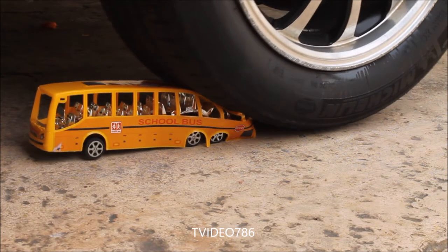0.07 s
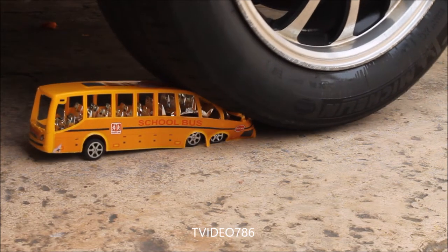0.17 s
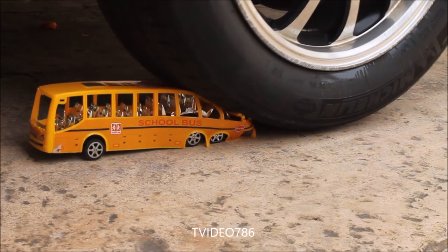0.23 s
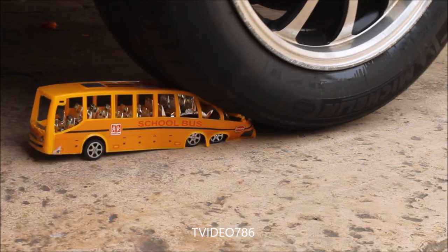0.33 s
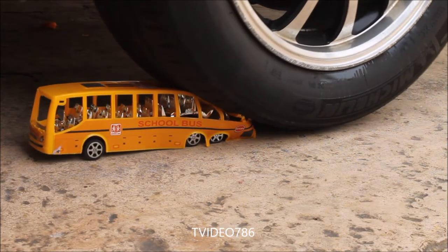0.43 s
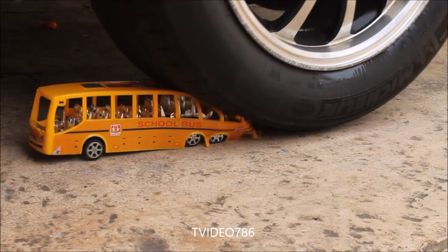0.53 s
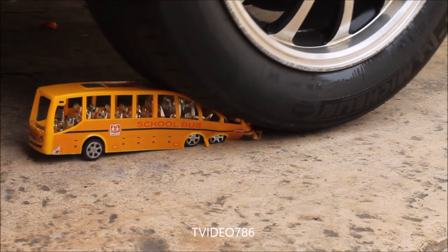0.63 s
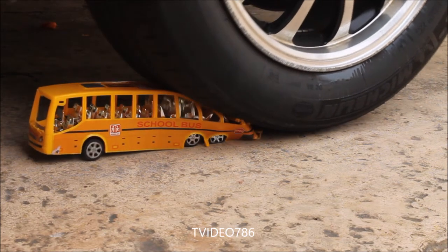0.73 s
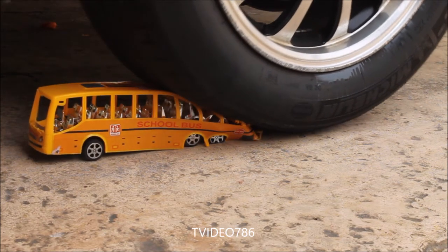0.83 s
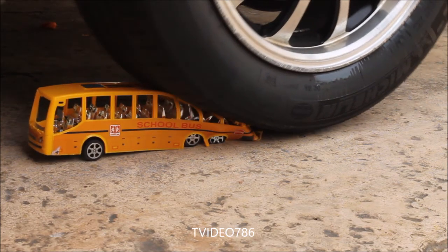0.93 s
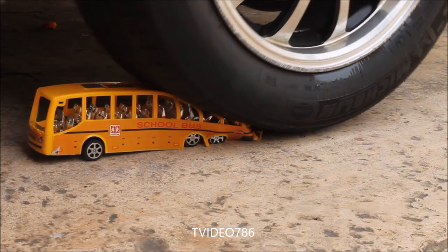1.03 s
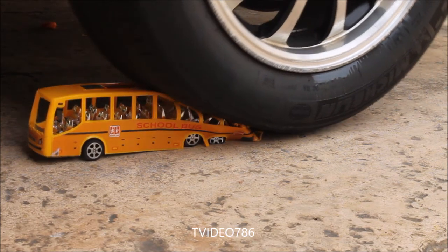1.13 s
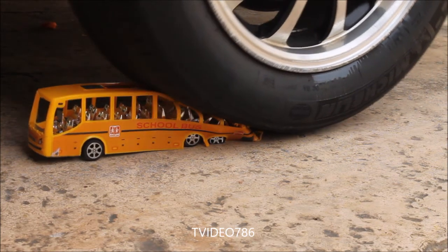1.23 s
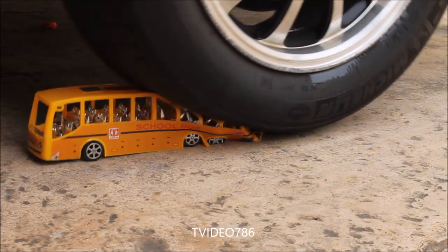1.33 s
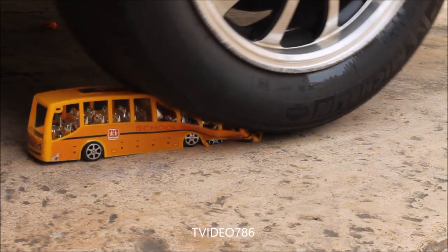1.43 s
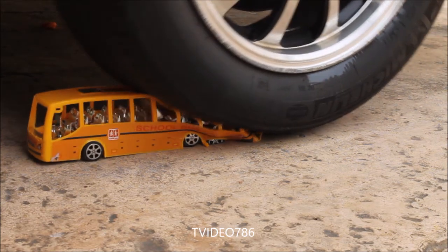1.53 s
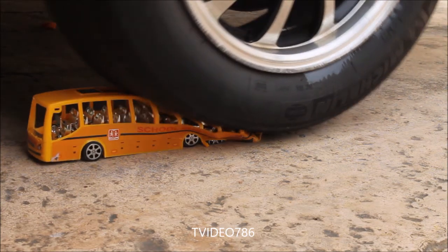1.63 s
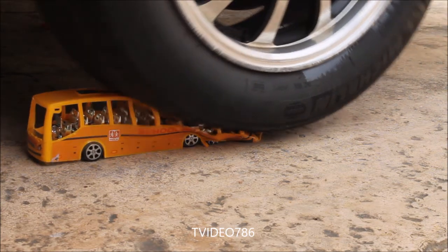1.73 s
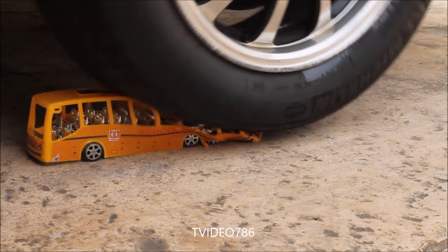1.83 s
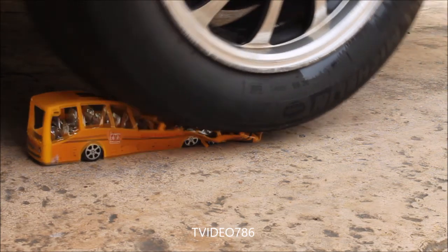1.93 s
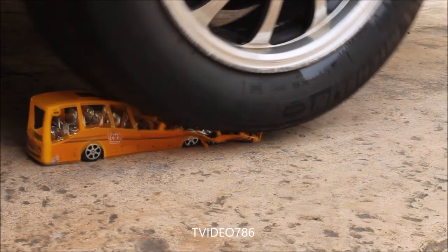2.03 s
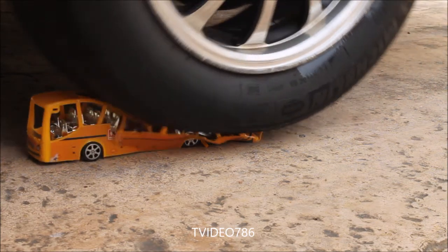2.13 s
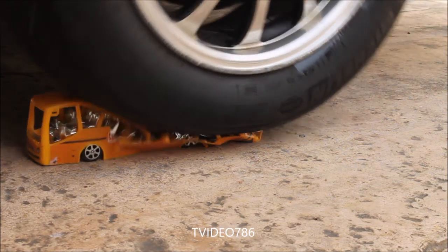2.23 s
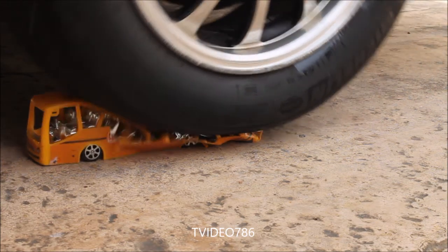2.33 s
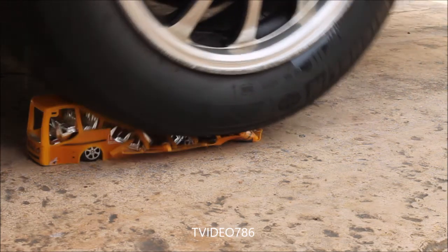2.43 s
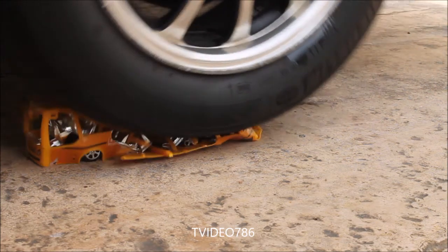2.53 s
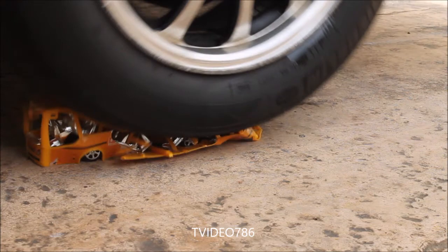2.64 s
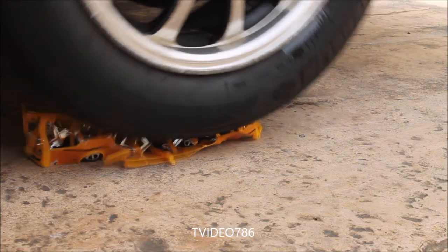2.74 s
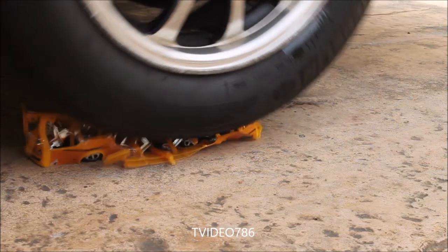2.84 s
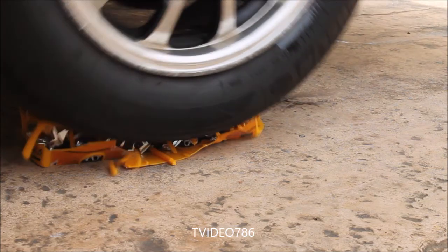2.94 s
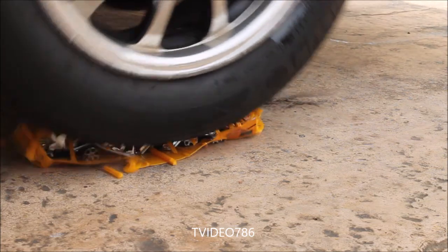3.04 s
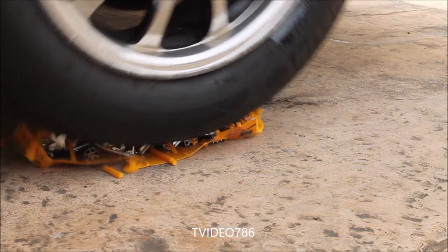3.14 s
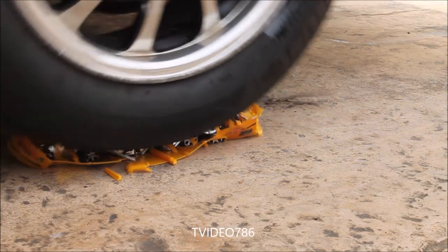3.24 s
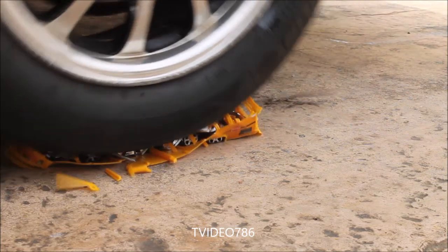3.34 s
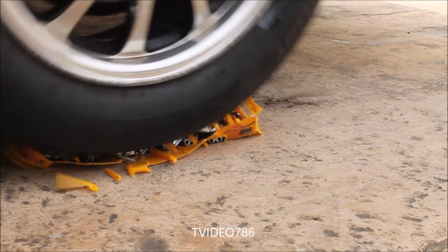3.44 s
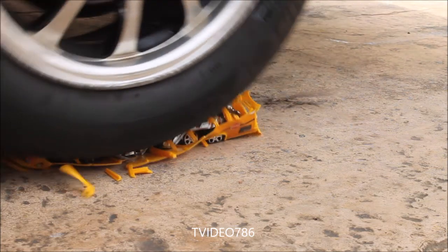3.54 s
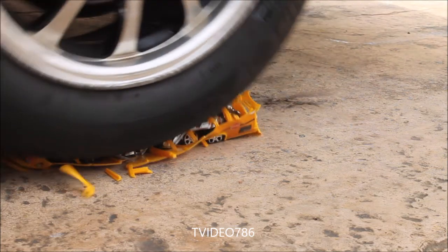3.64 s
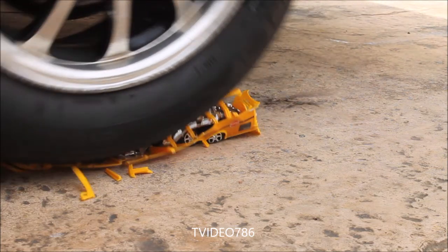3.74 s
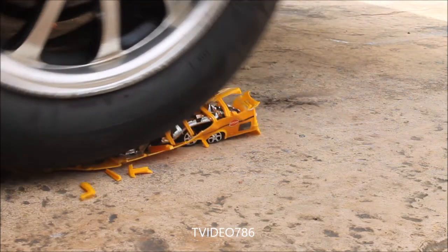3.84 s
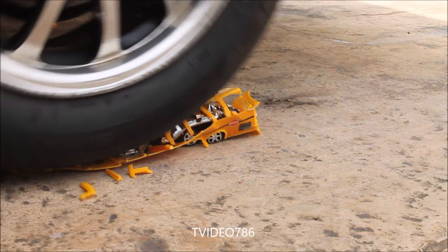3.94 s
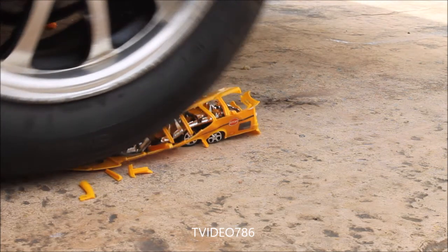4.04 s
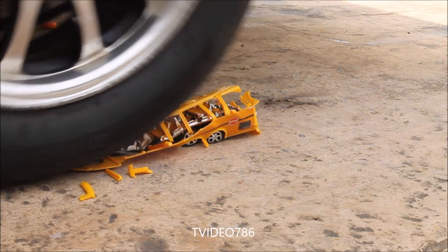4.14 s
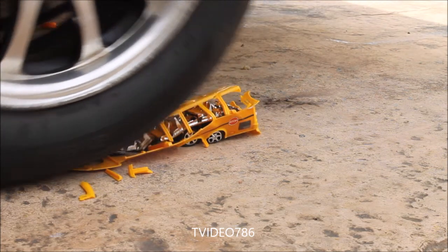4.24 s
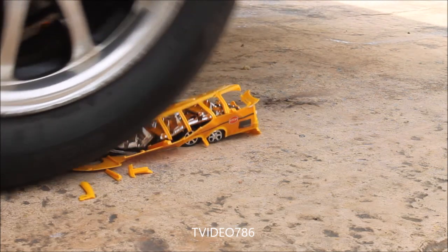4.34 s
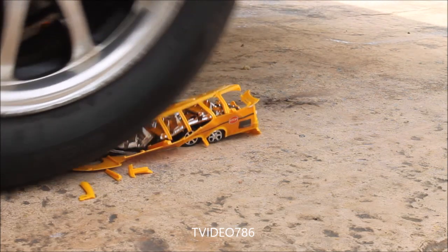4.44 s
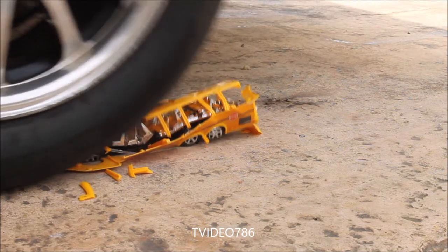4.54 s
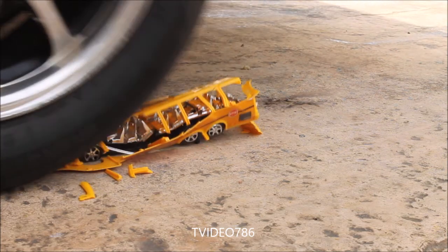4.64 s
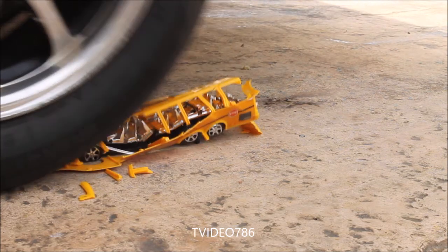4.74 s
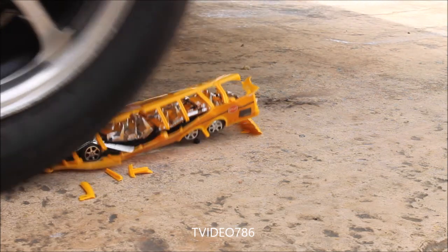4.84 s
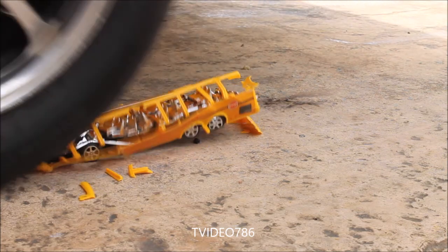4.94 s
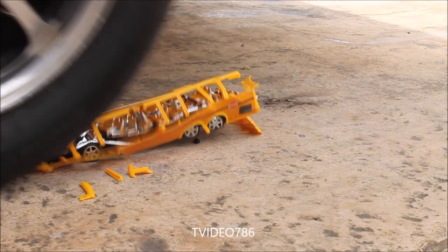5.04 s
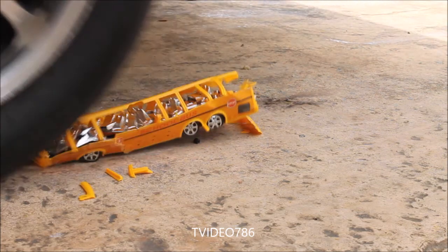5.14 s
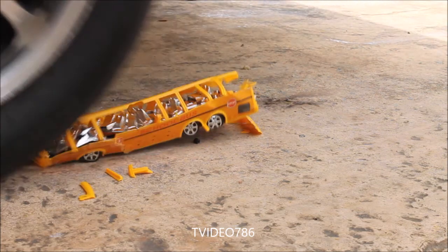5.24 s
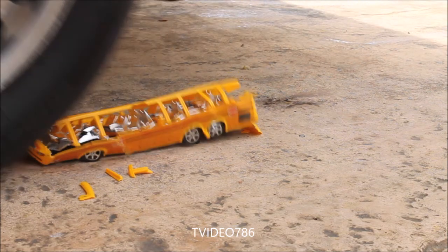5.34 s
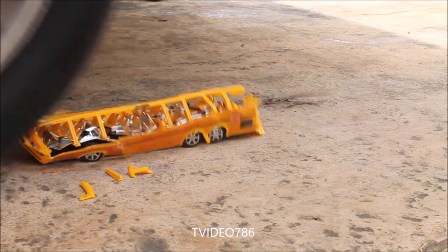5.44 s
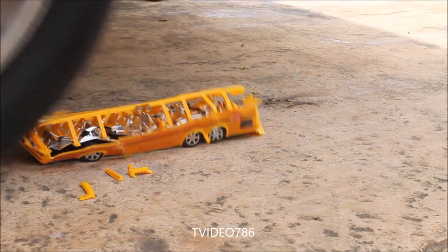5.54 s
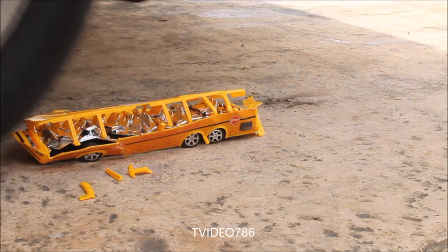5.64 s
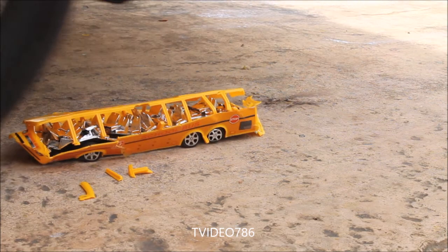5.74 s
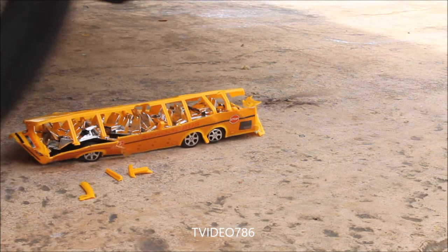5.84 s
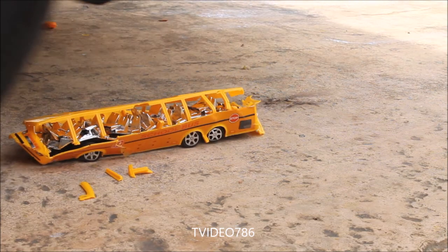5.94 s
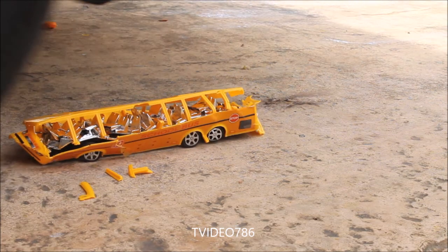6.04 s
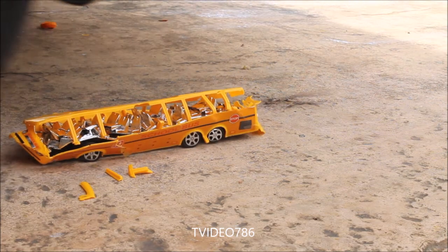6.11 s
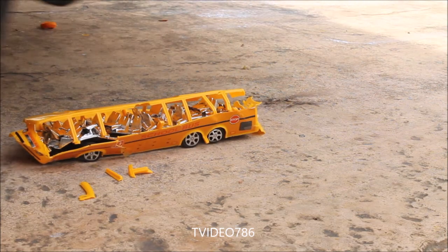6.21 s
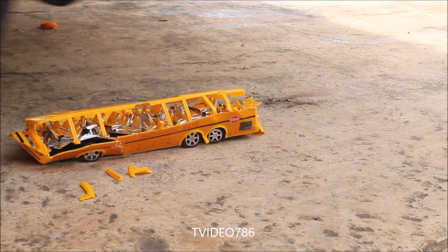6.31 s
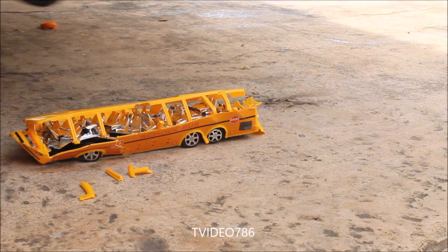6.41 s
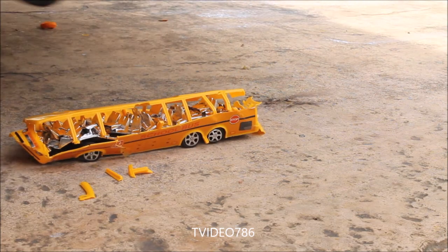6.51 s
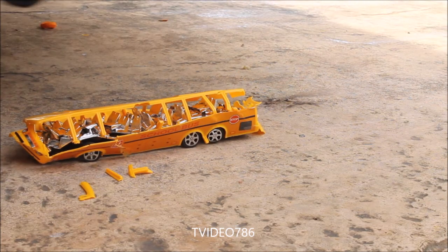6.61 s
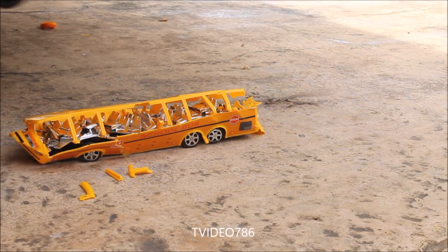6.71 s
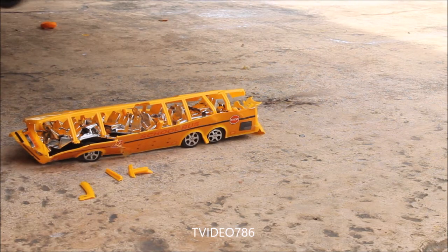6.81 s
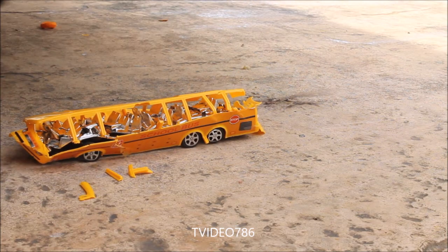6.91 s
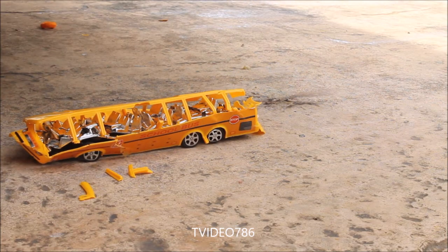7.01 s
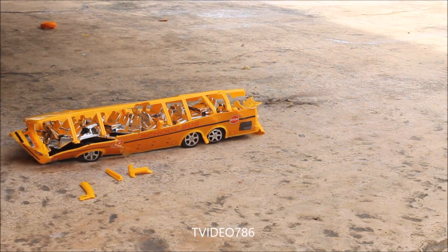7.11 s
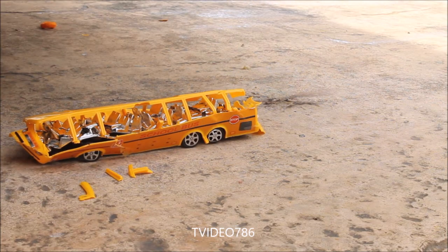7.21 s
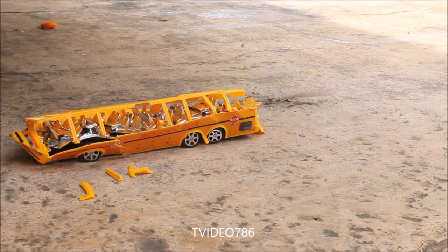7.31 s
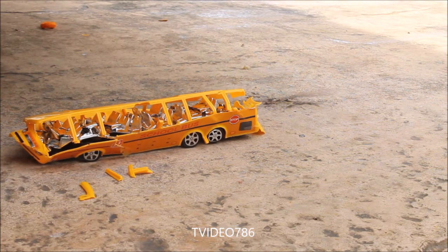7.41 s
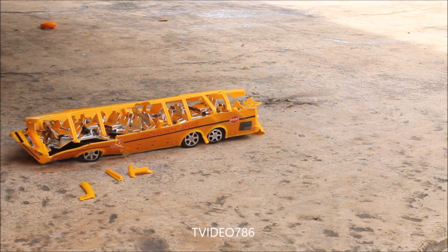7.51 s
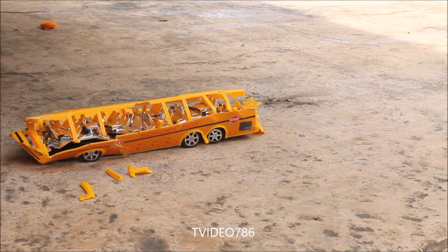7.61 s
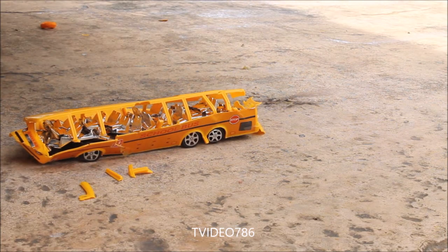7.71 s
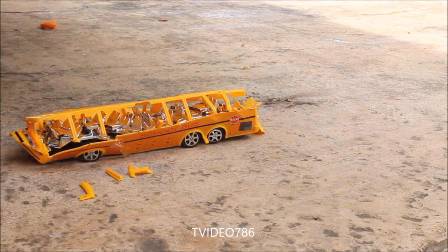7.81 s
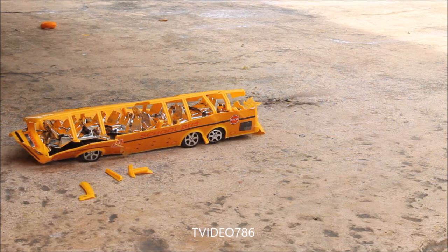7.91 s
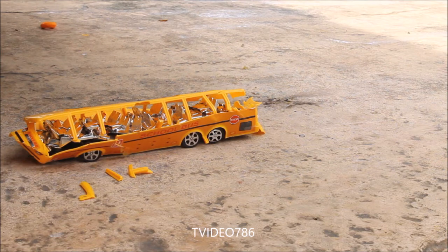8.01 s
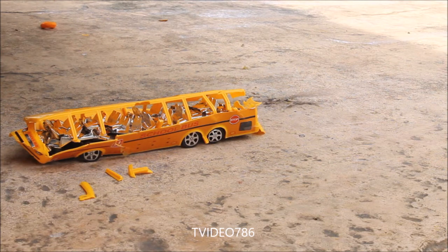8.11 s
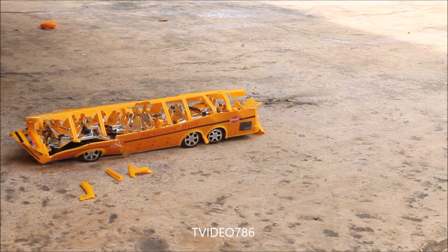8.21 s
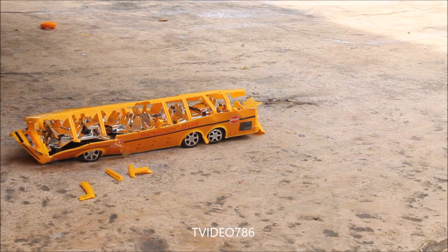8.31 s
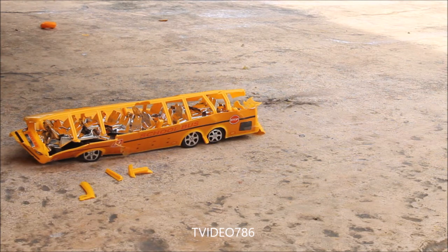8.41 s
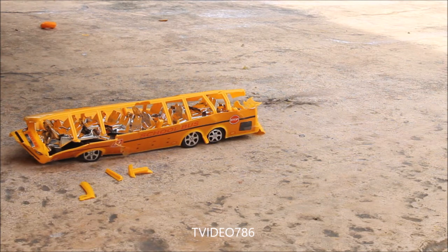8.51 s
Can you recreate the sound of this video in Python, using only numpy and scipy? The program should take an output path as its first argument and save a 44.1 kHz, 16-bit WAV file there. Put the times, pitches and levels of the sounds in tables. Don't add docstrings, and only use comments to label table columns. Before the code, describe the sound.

Close to a concrete yard floor, a tyre crushes a hollow plastic toy bus. Loud dry snaps, ragged tears and thudding cave-ins come in dense irregular clusters over fine crunching and creaking panels. Cracks grow sparser after four seconds, ending with faint taps; idling engine hum and distant traffic remain. The close microphone overloads, and the treble is dull as in slowed playback.

```python
import sys
import numpy as np
from scipy import signal
from scipy.fft import rfft, irfft
from scipy.io import wavfile
from scipy.ndimage import uniform_filter1d

SR = 44100
rng = np.random.default_rng(int(sys.argv[2]) if len(sys.argv) > 2 else 0)


def magnitude_from_level(level_db):
    exponent = np.asarray(level_db, float) / 20
    return 10 ** exponent


def dump_mix(stems):
    frames = np.atleast_2d(stems).T
    limited = np.clip(frames, -1, 1)
    pcm = np.round(limited * 32767).astype(np.int16)
    wavfile.write(sys.argv[1], SR, pcm)


N = 377496


def evened(x):
    return x / np.sqrt(np.mean(x ** 2) + 1e-20)


def read(points, hz):
    f, value = np.transpose(points)
    return np.interp(np.log(hz + 1), np.log(f + 1), value)


def follow(rows, t):
    s, *columns = np.transpose(rows)
    return [np.interp(t, s, c) for c in columns]


def add(mix, s, sound):
    part = mix[round(s * SR):][:len(sound)]
    part += sound[:len(part)]


def resonate(x, hz, width):
    turn = np.exp(2j * np.pi * np.cumsum(hz * np.ones(len(x))) / SR)
    r = np.exp(-np.pi * width / SR)
    return 2 * (turn * signal.lfilter([1 - r], [1, -r], x / turn)).real


def resonate_twice(x, hz, width):
    return resonate(resonate(x, hz, width), hz, width)


def coloured(x, points, tilt_db, size):
    hz, t, z = signal.stft(x, SR, nperseg=size)
    tilt_db = np.interp(t, np.arange(len(x)) / SR, tilt_db * np.ones(len(x)))
    octaves = np.log2((hz[:, None] + 100) / 1500)
    gain = magnitude_from_level(read(points, hz)[:, None] + octaves * tilt_db)
    gain = gain / np.sqrt((gain ** 2).mean(0))
    return signal.istft(z * gain, SR, nperseg=size)[1][:len(x)]


# f/Hz, level/dB
SNAP_COLOUR = [(180, -23), (300, 2.5), (758, 7.5), (2200, -1), (3180, -6.5), (3880, -11), (5280, -19.5),
               (5760, -18.5), (7490, -44.5), (12700, -120)]
# f/Hz, width/Hz, level/dB
BODY_THUD = [(219, 110, -6.5), (387, 220, -3.5), (530, 230, -6.5)]


def crack(peak_db, hz, t60, thud_db, tilt_db, noise, ring_db, sharpness):
    t = np.arange(len(noise)) / SR
    fade = magnitude_from_level(-60 * t / np.clip(t60, .01, .3))
    rise_s = 0.0011 * magnitude_from_level(-min(tilt_db, 0))
    fade *= 1 - np.exp(-t / rise_s)
    ragged_db = 3.0 * evened(uniform_filter1d(noise[::-1], size=60))
    fade *= magnitude_from_level(ragged_db)
    snap = evened(coloured(noise, SNAP_COLOUR, tilt_db, size=256) * fade)
    ring = resonate(resonate(noise * fade, hz, hz / sharpness), hz, hz / 2)
    snap += magnitude_from_level(ring_db) * evened(ring)
    push = noise * magnitude_from_level(-60 * t / 0.0074)
    thud = sum(magnitude_from_level(db) * resonate(resonate(push, f, w), f, w) for f, w, db in BODY_THUD)
    thud_gain = magnitude_from_level(min(thud_db, -7))
    return magnitude_from_level(peak_db) * (snap / abs(snap).max() + thud_gain * thud / abs(thud).max())


# t/s, peak level/dB, ring f/Hz, brightness/(dB per octave)
SNAPS = [(.285, 1.5, 2574, 1.5), (.553, 7, 716, 6), (.635, -1, 1116, -1.5), (.677, -5, 726, -3),
         (.886, 4, 1755, 3), (1.02, -3, 970, 13), (1.19, 5.5, 1270, 6), (1.301, 2, 1035, 3.5),
         (1.344, -2.5, 762, 2), (1.382, 3, 788, 4), (1.455, -6.5, 735, 0.5), (1.535, 1, 860, 9.5),
         (1.578, 2, 870, 8.5), (1.731, 2.5, 1900, 5.5), (2.301, 3, 1875, 4.5), (2.39, -6.5, 1060, 7.5),
         (2.558, 1.5, 1073, -3.5), (2.647, .5, 1310, -2.5), (2.719, -5, 856, 10), (3.077, -1.5, 660, 3),
         (3.112, 1.5, 1900, 3.5), (3.147, -1, 870, 2), (3.278, -7.5, 810, 6), (3.417, -5, 795, 2),
         (3.556, -2.5, 1900, 3.5), (4.165, 7.5, 2020, 6), (4.214, -10.5, 1834, 11.5), (4.328, -4.5, 750, 2),
         (4.836, -10.5, 670, -4.5), (5.286, -6.5, 910, -0.5)]
# t/s, peak level/dB, ring f/Hz, brightness/(dB per octave)
TEARS = [(1.275, -23, 884, 6), (1.546, 3.5, 1830, 0.5), (1.883, 4, 642, 4.5), (1.972, 2.5, 854, 3.5),
         (2.111, 0, 710, 3), (2.15, -11, 940, 4), (2.224, -2.5, 974, 3.5), (2.29, -2, 1020, 2),
         (2.472, -3, 1340, 4), (2.523, -2.5, 711, 2.5), (2.629, -7, 983, 7.5), (2.88, 0.5, 977, 3.5),
         (2.886, 2.5, 626, 4.5), (3.164, -3.5, 737, 5), (3.189, 0, 1433, 3), (3.611, -16, 1030, 3.5),
         (4.25, -4.5, 1330, 3.5), (4.272, -10, 2000, 10), (4.785, -6.5, 1795, 3.5), (5.494, -12, 850, -9)]
# t/s, peak level/dB, ring f/Hz, brightness/(dB per octave)
CAVES = [(.503, -14, 647, 4.5), (.601, -0.5, 651, 1), (.665, 13, 790, 2), (.834, -12, 780, -7.5),
         (1.157, -6, 700, 1.5), (1.489, 2.5, 975, 1), (1.901, 2.5, 966, 5), (1.981, -4, 943, 11),
         (2.202, -11.5, 905, 18), (2.26, -3.5, 963, 0), (2.711, 6, 1393, 3.5), (2.832, 2, 580, 2),
         (2.902, -3.5, 960, 3.5), (2.98, -11.5, 1290, 11.5), (3.044, -2, 2360, 8), (3.156, -6, 976, 7.5),
         (3.251, -7, 3170, 10), (3.4, -4, 920, 7.5), (3.938, 1.5, 1850, 0), (4.634, -14.5, 830, -1),
         (5.477, -13.5, 1970, 1.5)]
# t/s, peak level/dB, ring f/Hz, brightness/(dB per octave)
TICKS = [(.4305, 0.5, 464, -4.5), (2.093, -1.5, 366, 2), (3.234, -9, 340, -5.5), (3.773, -1.5, 886, -2.5),
         (3.797, -10, 378, -9.5), (3.826, -9.5, 500, -2), (3.916, -3, 666, -5), (3.976, -3, 706, -1),
         (4.017, -3.5, 856, -2), (4.044, -2.5, 750, -1.5), (4.072, -12, 840, -8.5), (4.097, -9.5, 812, -2)]
# t/s, peak level/dB, ring f/Hz, brightness/(dB per octave)
KNOCKS = [
    (.432, -2.5, 288, -2.5),
    (.447, -19, 493, -13),
    (.463, -10.5, 376, -10),
    (2.944, -5, 270, 5),
    (4.907, -10.5, 664, 1),
    (5.26, -25, 375, 5),
    (5.292, -19, 864, -7),
    (5.304, -18, 970, 0.5),
    (5.508, -23.5, 814, -11),
]
# t/s, peak level/dB, ring f/Hz, brightness/(dB per octave)
PINGS = [
    (.286, -13, 2810, 9.5),
    (.288, -15, 4450, 3),
    (1.01, -25, 3300, 14),
    (1.016, -9, 2630, 5),
    (3.236, -11, 306, -1),
]
# events, t60/s, thud level against the snap/dB, ring level/dB, sharpness of the ring
KINDS = [
    (SNAPS, 0.031, -17.5, -8, 11),
    (TEARS, 0.06, -8.5, -9.5, 15),
    (CAVES, 0.025, -11, -9.5, 12),
    (TICKS, .011, -8, -0.96, 2.5),
    (KNOCKS, 0.065, -3.5, 5.1, 2.8),
    (PINGS, 0.027, -12.5, 13, 3.4),
]


def cracks():
    shorter_db = 0.22
    out = np.zeros(N)
    for table, t60, thud_db, ring_db, sharpness in KINDS:
        noises = rng.standard_normal((len(table), 5000))
        for (s, db, hz, tilt_db), noise in zip(table, noises):
            break_t60 = t60 * magnitude_from_level(-shorter_db * db)
            add(out, s, crack(db, hz, break_t60, thud_db, tilt_db, noise, ring_db, sharpness))
    return out


def yard(x, t60=0.44, wet_db=-11.5):
    taps = np.zeros(SR // 2)
    at = np.arange(200, len(taps) - 20, 20)
    taps[at + rng.integers(0, 20, len(at))] = rng.choice([-1., 1.], len(at))
    taps *= magnitude_from_level(-60 * np.arange(len(taps)) / SR / t60)
    return x + magnitude_from_level(wet_db) * signal.fftconvolve(x, taps / np.linalg.norm(taps))[:N]


# start t/s, length/s, level/dB, brightness/(dB per octave), ring f/Hz
BURSTS = [(0.279, .14, -23, 0.5, 1300), (0.456, .08, -18.5, -3, 774), (0.568, .34, -16, 7, 1045),
          (0.876, 0.035, -20, 2, 1195), (1.185, 0.048, -12.5, 4.3, 1047), (1.246, .16, -16, 3, 974),
          (1.384, 0.99, -26, 5.5, 1100), (1.742, 0.18, -18, 4.8, 913), (2.109, 0.19, -24, 3.5, 1040),
          (2.713, 0.16, -16.5, 4, 1002), (2.888, 0.24, -16.5, 2.5, 865), (3.163, 0.9, -25.5, 4.5, 996),
          (4.196, 0.27, -15.5, 6.5, 1555), (4.808, 0.051, -28.5, 2, 1506), (4.87, 0.5, -34.5, 1.5, 800)]
# middle t/s, length/s, level/dB, brightness/(dB per octave), ring f/Hz
SQUEEZES = [
    (1.098, 0.29, -20, 2.1, 968),
    (1.997, 0.14, -16.5, 4.5, 1114),
    (2.504, 0.25, -23, 2, 1017),
    (3.644, 0.21, -19.5, 1.4, 868),
    (4.45, 0.34, -21, 4.5, 1800),
    (4.095, 0.04, -39.5, 10, 760),
]


def pressure(t):
    shapes = []
    for s, length, db, *_ in BURSTS:
        sag_db = -4 * (t - s) / length
        release_db = -20 * np.maximum(t - s - length, 0) / 0.02
        shapes.append(magnitude_from_level(db + sag_db + release_db) * (t > s))
    for s, length, db, *_ in SQUEEZES:
        shapes.append(magnitude_from_level(db) * np.exp(-2 * ((t - s) / length) ** 2))
    power = np.array(shapes) ** 2 + 1e-12
    total = power.sum(0)
    tilt_db, hz = np.array(BURSTS + SQUEEZES)[:, 3:].T @ power / total
    return np.sqrt(total), tilt_db, hz


# f/Hz, level/dB
GRIT_COLOUR = [(88, -24.5), (150, 8), (593, 2), (908, 3), (996, -2.5), (2040, -5), (2770, -16), (4870, -31),
               (5760, -40), (7490, -59.5), (12700, -120)]


def crunch(clump_db=0.15, width=450):
    level, tilt_db, hz = pressure(np.arange(N) / SR)
    ring_db = -13 + 0.19 * tilt_db
    chance, size = rng.random(N), rng.exponential(1, N)
    sign, clump = rng.standard_normal(N), rng.standard_normal(N)
    grains = (chance < 9000 / SR) * magnitude_from_level(2.5 * np.minimum(size, 4)) * sign
    grains *= magnitude_from_level(clump_db * evened(uniform_filter1d(clump, size=500)))
    ring = evened(resonate(resonate(grains, hz, width), hz, 2 * width))
    body = evened(coloured(grains, GRIT_COLOUR, tilt_db, size=512)) + magnitude_from_level(ring_db) * ring
    return level * body / np.sqrt(1 + magnitude_from_level(2 * ring_db))


# start t/s, length/s, level/dB, f/Hz
CREAKS = [
    (0.304, 0.086, -31, 1280),
    (1.204, 0.29, -19.5, 948),
    (2.57, 0.11, -31, 1020),
    (5.283, 0.097, -27.5, 910),
]


def creaks(width=300):
    out = np.zeros(N)
    noises = rng.standard_normal((len(CREAKS), SR // 2))
    for (s, length, db, hz), noise in zip(CREAKS, noises):
        u = np.minimum(np.arange(len(noise)) / SR / length, 1)
        swell = np.sin(np.pi * u ** .6)
        add(out, s, magnitude_from_level(db) * swell * evened(resonate_twice(noise, hz, width)))
    return out


def engine(hz):
    shake, air = rng.standard_normal((N, 2)).T
    hum = evened(resonate_twice(shake, hz, 18.0))
    rumble = evened(resonate_twice(air, 24, 56))
    return hum + magnitude_from_level(-5.0) * rumble


# f/Hz, level/dB
WASH_COLOUR = [(47, -19), (80, -6), (108, -5), (210, -7), (261, -1), (360, -4.5), (393, -6), (638, -9),
               (1150, -15.5), (1400, -16.5), (4650, -38), (5760, -43.5), (7490, -74.5), (12700, -120)]


def street_wash(hum_db, patchy_db=2.1):
    a, b, patches = rng.standard_normal((N // 256 + 5, 513, 3)).T
    patches = uniform_filter1d(patches, size=6, axis=0)
    patches = evened(uniform_filter1d(patches, size=16, axis=1))
    colour_db = read(WASH_COLOUR, np.fft.rfftfreq(1024, 1 / SR))[:, None]
    z = (a + 1j * b) * magnitude_from_level(colour_db + patchy_db * patches)
    wash = evened(signal.istft(z, nperseg=1024, noverlap=768)[1][:N])
    low = signal.sosfiltfilt(signal.butter(2, 170, fs=SR, output="sos"), wash)
    return wash + low * (magnitude_from_level(0.5 * (hum_db + 41.5)) - 1)


# t/s, street wash level/dB, engine level/dB, engine hum f/Hz
CAR = [(0., -18.5, -40, 45), (.4, -30.5, -29, 52.9), (.7, -13, -40.5, 58.6), (1.1, -22.5, -30, 51.3),
       (1.6, -28, -40, 55.7), (2.0, -17.5, -47.5, 56.4), (2.6, -27.5, -42, 51), (3.35, -22.5, -51, 54.8),
       (3.6, -23, -34, 51.8), (4.29, -21, -40, 52.7), (4.6, -25.5, -35.5, 48.6), (5.6, -25.5, -38.5, 51.1),
       (6.4, -27, -41.5, 50.7), (7.45, -27, -38, 54), (8.56, -26.5, -39.5, 50.9)]


def background():
    wash_db, hum_db, hz = follow(CAR, np.arange(N) / SR)
    return magnitude_from_level(wash_db + 0.5) * street_wash(hum_db) + magnitude_from_level(hum_db + 5.0) * engine(hz)


# start t/s, end t/s, f/Hz, width/Hz, level/dB
SWELLS = [
    (5.7, 6.7, 263, 25, -35.),
    (7.1, 7.6, 112, 25, -33.),
    (7.1, 8.2, 165, 60, -33.),
    (8.12, 8.9, 1150, 350, -36.),
    (.8, 1.25, 60, 8, -27.),
    (3.3, 3.8, 57, 9, -33.),
]


def traffic():
    t, out = np.arange(N) / SR, np.zeros(N)
    noises = rng.standard_normal((len(SWELLS), N))
    for (start, end, hz, width, db), noise in zip(SWELLS, noises):
        swell = np.sin(np.pi * np.clip((t - start) / (end - start), 0, 1))
        out += magnitude_from_level(db) * swell * evened(resonate_twice(noise, hz, width))
    return out


def ducked(x, loud):
    from_db, share, recovery_db_per_s = -23, 0.19, 61
    power_db = 10 * np.log10(abs(uniform_filter1d(loud ** 2, size=800)) + 1e-12)
    fall = np.arange(N) * recovery_db_per_s / SR
    held_db = np.maximum.accumulate(power_db + fall) - fall
    over_db = np.maximum(held_db - from_db, 0)
    return x * magnitude_from_level(-share * uniform_filter1d(over_db, size=400))


def scene():
    breaks = yard(cracks())
    behind = ducked(background() + traffic(), breaks)
    return (breaks + crunch() + behind + creaks())[None]


# t/s, f above which little survives/Hz
THIN_MOMENTS = [(.306, 3200), (.455, 2100), (.461, 2100), (1.022, 3000), (1.369, 3100), (1.834, 2750),
                (2.497, 2400), (3.882, 2450), (4.093, 3300), (4.457, 2450), (4.584, 2600), (4.93, 3500),
                (5.119, 2250), (5.332, 2500), (5.438, 2800), (5.567, 2300), (5.759, 2600), (5.95, 2600),
                (6.187, 2700), (6.355, 2500), (6.592, 2400), (6.889, 2800), (7.04, 2600), (7.104, 2400),
                (7.166, 2700), (7.275, 2400), (7.423, 3600), (7.529, 2700), (7.935, 2250), (8.34, 2800)]


def thinned(x, count=7):
    length_s = .04
    out = x.copy()
    for s, edge_hz in THIN_MOMENTS:
        start, n = round((s - length_s / 2) * SR), round(length_s * SR)
        window = np.sin(np.pi * np.arange(n) / n)
        z, hz = rfft(x[start:start + n] * window), np.fft.rfftfreq(n, 1 / SR)
        high = abs(z) * (hz > edge_hz) * np.sqrt(hz)
        change = np.where(high < np.sort(high)[-count], -.92, .8)
        out[start:start + n] += irfft(z * (hz > edge_hz) * change, n) * window
    return out


def roll_off(x):
    return signal.sosfilt(signal.butter(12, 16300, fs=SR, output="sos"), x)


def record(dry):
    edge = signal.firwin(201, 5790, window=("kaiser", 10), fs=SR)
    slowed = thinned(signal.oaconvolve(dry[0], edge, "same"))
    overloaded = np.clip(slowed, -.995, .995)
    top = signal.firwin(151, 16300, window=("kaiser", 8), fs=SR)
    mix = signal.oaconvolve(overloaded, top, "same")
    return roll_off(mix[None])


dry = scene()
out = record(dry)
dump_mix(out)
```